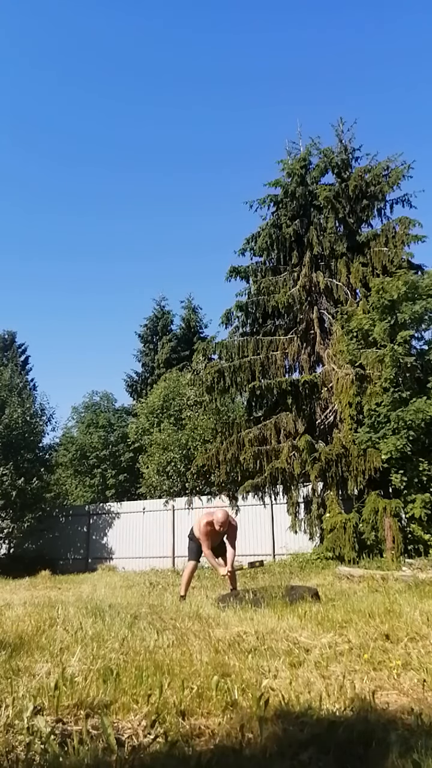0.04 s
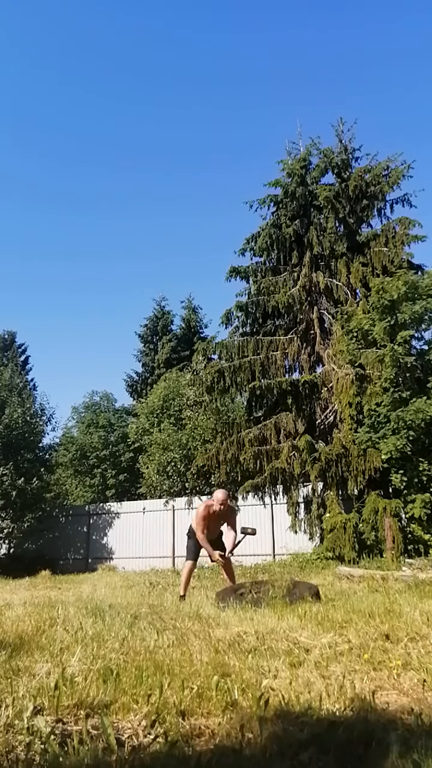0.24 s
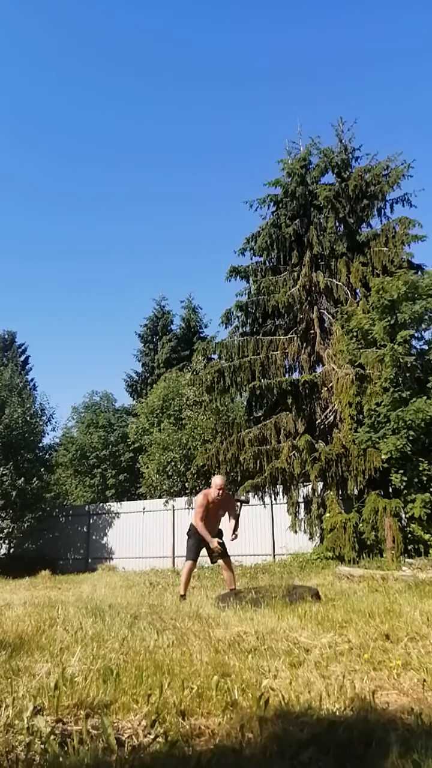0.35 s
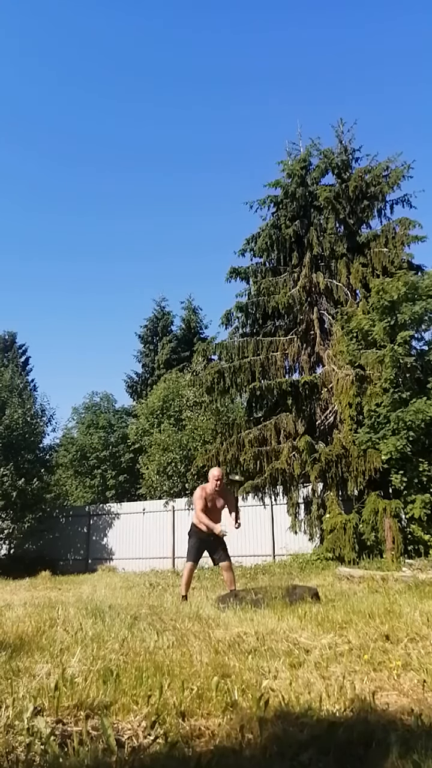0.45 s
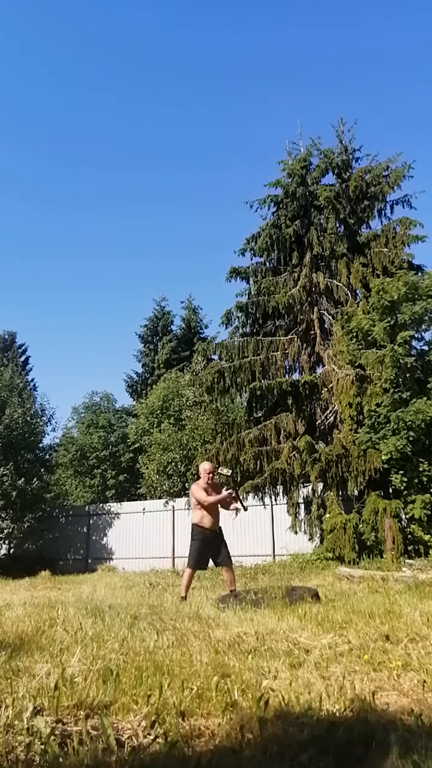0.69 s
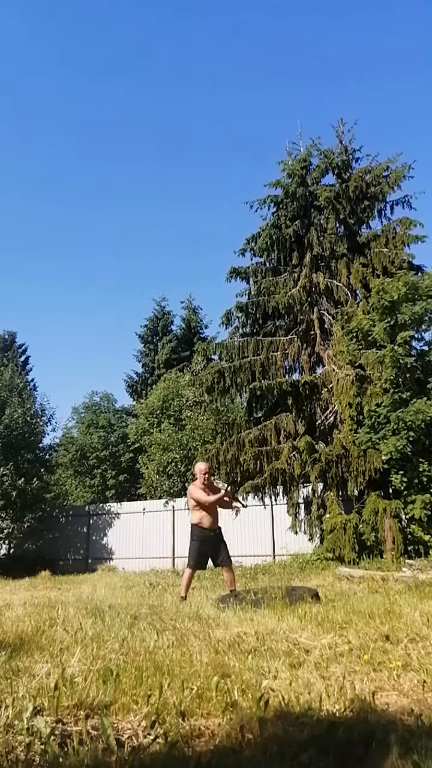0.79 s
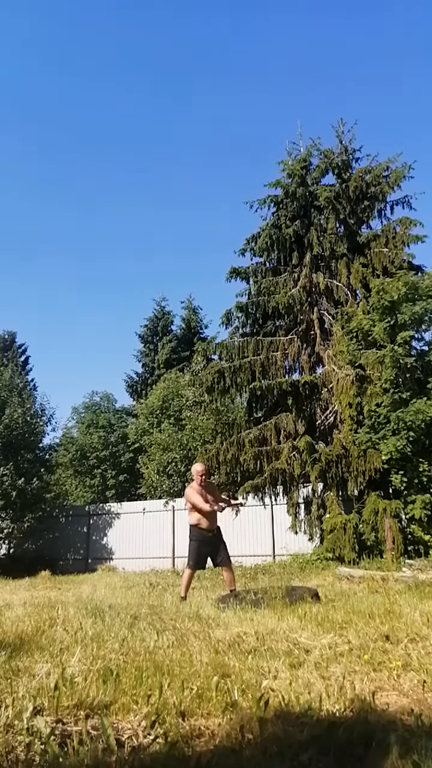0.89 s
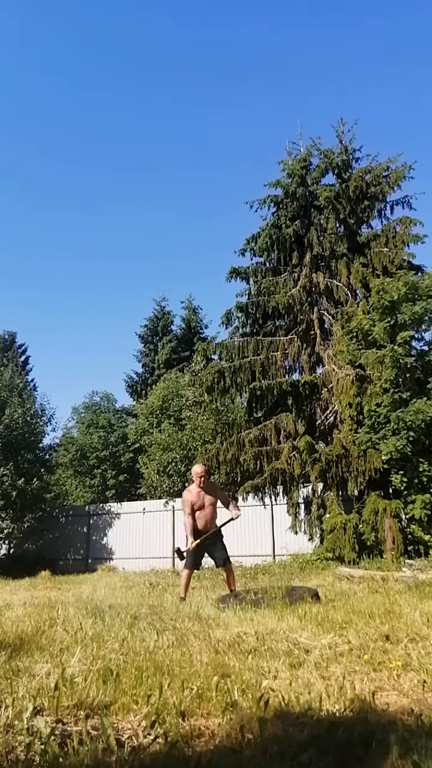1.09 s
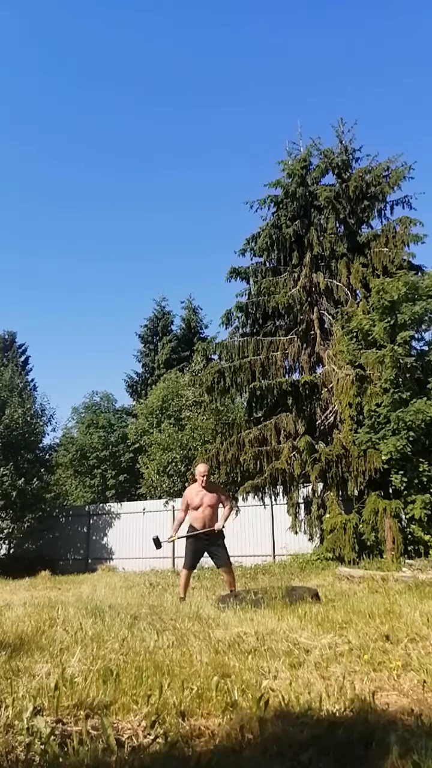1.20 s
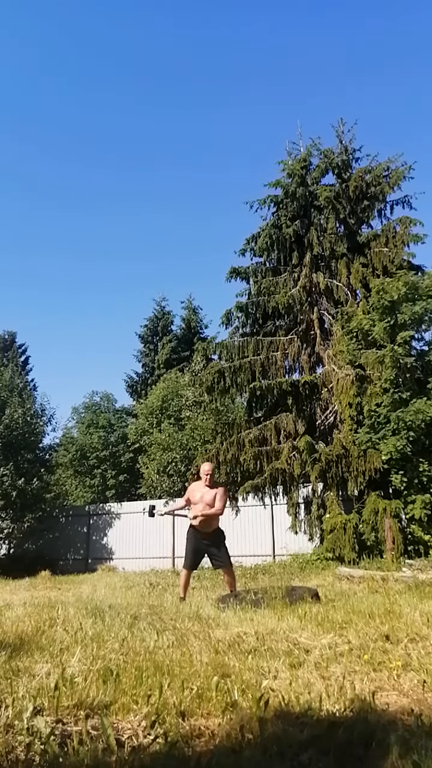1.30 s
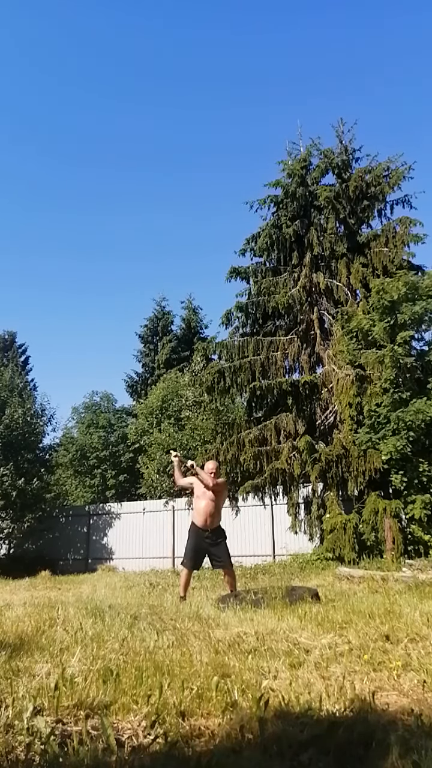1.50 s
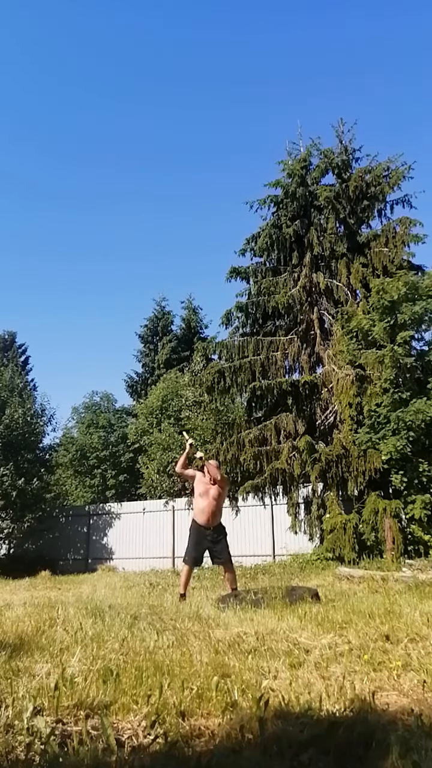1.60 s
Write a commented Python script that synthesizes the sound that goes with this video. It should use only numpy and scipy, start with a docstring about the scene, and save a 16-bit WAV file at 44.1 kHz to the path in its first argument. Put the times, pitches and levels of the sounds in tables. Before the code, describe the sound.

A sledgehammer hits a large tyre once: a brief swish, then a hard slap with a deep thud. The blow echoes briefly off fence and trees as the tyre settles softly on the grass in a quiet garden.

```python
"""On a garden lawn, a sledgehammer swishes down onto a large tyre lying in the grass.
Steel hits rubber with a hard slap and a softer second one, and the tyre rings with a deep thud.
Fence and trees throw the blow back; the tyre hops, settles and wobbles.
Behind it are quiet air, a faint low hum, tiny high ticks and two chirps from a far bird."""
import sys
import numpy as np
from scipy import signal
from scipy.io import wavfile

SR = 44100
rng = np.random.default_rng(int(sys.argv[2]) if len(sys.argv) > 2 else 0)


def wrap_up_sound(samples):
    """Save the sound to the file named by the first command line argument, as 16-bit audio."""
    columns = np.atleast_2d(samples).T
    # keep every value between -1 and 1, then stretch to whole-number steps
    tamed = np.clip(columns, -1, 1)
    steps = np.round(tamed * 32767).astype(np.int16)
    wavfile.write(sys.argv[1], SR, steps)


N = 72765
T = np.arange(N) / SR

# A fade is the time a sound takes to drop 60 dB. Pan is left minus right: below 0 leans right.
# garden air: (pitch [Hz], band level [dB])
AIR_BANDS = [(30, -67.5), (50, -83.5), (90, -83), (170, -76.5), (300, -85), (600, -85.5), (1300, -84),
             (3100, -86), (3900, -94), (5200, -85), (7000, -89), (11000, -89), (15000, -83.5)]
# how noise spreads between the ears: (pitch [Hz], pan [dB], likeness of left and right [0 to 1])
STEREO_SPREAD = [(40, -7, 1), (150, -14, 0.79), (500, -13.5, 0.84), (2020, -8, 0.14), (4000, -9.5, 0.5),
                 (8200, 8, 0.019), (14100, -1.5, 0.32)]
# distant hum: (time [s], pitch [Hz], level [dB])
HUM_PATH = [(0, 88.53, -76), (.75, 86.67, -67.5), (0.999, 85.16, -72.5), (1.2, 82.27, -65.5),
            (1.48, 82.1, -63.5), (1.65, 82.4, -70)]
# air rushing past the hammer: (pitch [Hz], band level at the blow [dB])
SWISH_BANDS = [(300, -73.5), (800, -72), (1300, -56), (2000, -56.5), (2900, -55.5), (3900, -75),
               (5300, -65), (9000, -69), (15000, -84.5)]
# the hammer meets the rubber: (time [s], ring level [dB], treble boost [dB per octave], grit level [dB])
SLAP_HITS = [(0.2001, 1, -0.5, -18), (0.2151, -16, 2.5, -20)]
# tones that ring in a slap: (pitch [Hz], level [dB], fade [s], pan [dB])
SLAP_TONES = [(696, -36.5, 0.033, -12), (800, -31, .02, -21), (1144, -28, 0.022, -16),
              (1800, -28, 0.0099, -8.5), (2390, -19.5, 0.0066, -14), (2736, -18.5, 0.0055, -8),
              (4720, -23, 0.005, -25), (5570, -31, 0.0058, 15.5), (8250, -14, 0.0035, 20),
              (9760, -29.5, 0.0066, 5), (11300, -25.5, 0.0025, 9)]
# ringing noise around the tyre: (pitch [Hz], band level [dB], fade [s])
TAIL_BANDS = [(35, -62.5, 0.33), (90, -38, 1), (149, -39, 1), (230, -39, .55), (350, -41.5, 0.41),
              (550, -47.5, 0.39), (800, -48, 0.17), (1200, -54.5, 0.3), (2970, -49.5, 0.51),
              (3800, -62.5, 0.51), (4870, -56, 0.41), (8800, -51.5, 0.39), (14900, -67, 0.22)]
# sound scattered by leaves: (pitch [Hz], band level [dB])
LEAF_BANDS = [(200, -75.5), (450, -67.5), (800, -71.5), (1200, -62.5), (2000, -61.5), (3000, -58),
              (3900, -67.5), (5200, -60.5), (8000, -58), (11000, -68), (15000, -74.5)]
# groups of trees that scatter the blow: (delay [s], level [dB])
TREE_GROUPS = [(0.114, 0), (.185, -4)]
# tones of the tyre's body: (pitch [Hz], level [dB], fade [s], direction of first swing [+1 or -1])
TYRE_TONES = [(79.5, -19, 0.13, -1), (144.3, -14.5, .15, 1), (198.7, -20, 0.2, 1), (260, -31.5, .23, -1),
              (329, -22.5, 0.13, -1), (390.4, -33, .1, -1), (463.3, -34.5, 0.14, 1), (520, -36, 0.048, 1)]
# separate echoes from fence and trees: (delay [s], level [dB])
ECHO_RETURNS = [(0.054, -11.5), (0.091, -26), (0.1473, -15), (.52, -49.5), (.59, -47)]
# the tyre drops back on the grass: (time [s], level [dB])
TYRE_LANDINGS = [(.434, -30.5), (.455, -30), (.492, -31), (0.521, -30), (.556, -35.5)]
# slow flexing of the tyre: (time [s], pitch [Hz], level [dB], fade [s])
TYRE_WOBBLES = [(.497, 44.1, -38.5, 0.35), (.556, 15.16, -41.5, 0.92)]
# a far bird: (time [s], length [s], first pitch [Hz], last pitch [Hz], level [dB])
BIRD_CHIRPS = [(1.193, 0.0595, 4650, 5170, -82), (1.242, 0.12, 2950, 3470, -81.5)]

HIT_S, SQUASH_S = .2003, .0012  # the rubber squashes briefly before the tyre rings
TYRE_PAN_DB, BACKGROUND_PAN_DB = -11.5, -9.5


def from_db(db):
    """Turn decibels into a number to multiply by."""
    return 10 ** (np.asarray(db) / 20)


def at_hz(rows, hz):
    """Read a table's other columns at one pitch, blending between rows."""
    pitches, *columns = np.transpose(rows)
    return [np.interp(np.log(hz), np.log(pitches), column) for column in columns]


def pan(db):
    """Share a sound between left and right, keeping its total power."""
    gains = from_db([[db / 2], [-db / 2]])
    return gains / np.sqrt(np.mean(gains ** 2))


def lowpass(x, hz):
    """Dull a sound by turning down what lies above hz."""
    return signal.sosfilt(signal.butter(2, hz, fs=SR, output="sos"), x + 1e-18)


def decay(start, fade_s):
    """A level that jumps to 1 and dies away."""
    return (T >= start) * 1e3 ** (-np.maximum(T - start, 0) / fade_s)


def ring(start, hz, fade_s):
    """One fading tone of a struck object."""
    return decay(start, fade_s) * np.sin(2 * np.pi * hz * (T - start))


def spread_noise(gain_at, pan_db=None):
    """Stereo noise in quarter-octave bands; gain_at(hz) gives the strength per quarter octave."""
    out, edges = 0, 22 * 2 ** np.arange(0, 9.6, .25)
    white = rng.standard_normal((2, 2, N + SR // 2))
    for k, (low, high) in enumerate(zip(edges, edges[1:])):
        band_filter = signal.butter(3, [low, high], "band", fs=SR, output="sos")
        band = signal.sosfilt(band_filter, white[k % 2])[:, -N:]
        mid, side = band / band.std(axis=1, keepdims=True)
        hz = np.sqrt(low * high)
        lean_db, alike = at_hz(STEREO_SPREAD, hz)
        pair = np.sqrt((1 + alike) / 2) * mid + np.sqrt((1 - alike) / 2) * side * [[1], [-1]]
        out = out + gain_at(hz) * np.sqrt(.5) * pair * pan(lean_db if pan_db is None else pan_db)
    return out


def garden_air():
    """The air makes a soft, steady hiss and rumble."""
    return spread_noise(lambda hz: from_db(at_hz(AIR_BANDS, hz)[0]), BACKGROUND_PAN_DB)


def distant_hum(octave_db=-23.5):
    """A low hum sinks a little in pitch as it swells."""
    times, hz, db = np.transpose(HUM_PATH)
    phase = 2 * np.pi * np.cumsum(np.interp(T, times, hz)) / SR
    tone = np.sin(phase) + from_db(octave_db) * np.sin(2 * phase)
    return np.sqrt(2) * from_db(np.interp(T, times, db)) * tone * pan(BACKGROUND_PAN_DB)


def faint_ticks(per_second=8, level_db=-75.5, pitch_hz=7800, fade_s=.015):
    """Tiny bursts of high fizz come at random moments."""
    fizz = lowpass(rng.standard_normal(N), hz=900) * np.sin(2 * np.pi * pitch_hz * T)
    starts = rng.random(N) < per_second / SR
    bursts = signal.lfilter([1], [1, -from_db(-60 / (fade_s * SR))], starts + 1e-18)  # each start fades
    return from_db(level_db) * bursts * fizz / fizz.std() * pan(BACKGROUND_PAN_DB)


def hammer_swish(swing_s=.14, stop_s=.0015, steepness=1.44, steeper_per_hz=.00012):
    """Rushing air grows with the hammer's speed, the treble most steeply, and stops at the blow."""
    speed = np.clip(1 + (T - HIT_S) / swing_s, 0, 1)
    stop = np.exp(-np.maximum(T - HIT_S, 0) / stop_s)

    def gain_at(hz):
        return from_db(at_hz(SWISH_BANDS, hz)[0]) * speed ** (steepness + steeper_per_hz * hz) * stop
    return spread_noise(gain_at)


def hammer_slaps(contact_s=.0006, pivot_hz=3000, grit_cut_hz=10500, cut_hz=14100):
    """Steel lands on rubber: short bright tones and a burst of grit build up during contact."""
    out = 0
    for start, ring_db, boost_db, grit_db in SLAP_HITS:
        contact = np.clip((T - start) / contact_s, 0, 1) ** .5
        tones = 0
        for hz, db, fade_s, pan_db in SLAP_TONES:
            gain = from_db(db + boost_db * np.log2(hz / pivot_hz))
            tones = tones + gain * ring(start, hz, fade_s) * pan(pan_db)
        hiss = lowpass(rng.standard_normal((2, N)), grit_cut_hz)
        grit = hiss * decay(start, fade_s=.0022) * pan(db=2.5)
        out = out + contact * (from_db(ring_db) * tones + from_db(grit_db) * grit)
    return lowpass(lowpass(out, cut_hz), cut_hz)


def ringing_tail():
    """A wash of noise hangs around the tyre after the blow; low pitches last longest."""
    def gain_at(hz):
        db, fade_s = at_hz(TAIL_BANDS, hz)
        return from_db(db) * decay(HIT_S, fade_s)
    return spread_noise(gain_at)


def leaf_scatter(rise_s=.015, fade_s=.72, loss_db_per_s_khz=6.5):
    """Each group of trees sends back a soft blur of the blow; the longer the path, the less treble."""
    age = np.maximum(T - HIT_S, 0)
    power = 0
    for delay, db in TREE_GROUPS:
        rise = np.exp(-np.maximum(delay - age, 0) / rise_s)
        fall = from_db(-60 * np.maximum(age - delay, 0) / fade_s)
        power = power + (from_db(db) * rise * fall) ** 2
    swell = (T > HIT_S) * np.sqrt(power)

    def gain_at(hz):
        loss_db = loss_db_per_s_khz * age * hz / 1000
        return swell * from_db(at_hz(LEAF_BANDS, hz)[0] - loss_db)
    return spread_noise(gain_at)


def tyre_thud(start):
    """One push sets the tyre's body ringing with deep tones."""
    tones = sum(np.sign(way) * from_db(db) * ring(start, hz, fade_s) for hz, db, fade_s, way in TYRE_TONES)
    return tones * pan(TYRE_PAN_DB)


def echoes(start, cut_hz=132):
    """Fence and trees return late, dull copies of the thud."""
    return lowpass(sum(from_db(db) * tyre_thud(start + delay) for delay, db in ECHO_RETURNS), cut_hz)


def landings(cut_hz=252):
    """The tyre drops back on the grass with small, muffled thuds."""
    thuds = sum(from_db(db) * tyre_thud(start) for start, db in TYRE_LANDINGS)
    return lowpass(lowpass(thuds, cut_hz), cut_hz)


def wobble():
    """The tyre flexes slowly after it lands."""
    return sum(from_db(db) * ring(start, hz, fade_s) for start, hz, db, fade_s in TYRE_WOBBLES) * pan(db=-24)


def far_bird(blur_hz=120):
    """A bird gives two rising chirps, blurred by a random flutter."""
    blur = lowpass(rng.standard_normal(N), blur_hz)
    chirps = 0
    for start, length, first_hz, last_hz, db in BIRD_CHIRPS:
        progress = np.clip((T - start) / length, 0, 1)
        phase = 2 * np.pi * np.cumsum(first_hz + (last_hz - first_hz) * progress) / SR
        chirps = chirps + from_db(db) * np.sin(np.pi * progress) * np.sin(phase)
    return chirps * blur / blur.std() * pan(BACKGROUND_PAN_DB)


def scene():
    """Add up the hammer, the tyre, the returning sound and the quiet garden."""
    thud_s = HIT_S + SQUASH_S
    hammer = hammer_swish() + hammer_slaps()
    tyre = tyre_thud(thud_s) + landings() + wobble()
    returning = ringing_tail() + leaf_scatter() + echoes(thud_s)
    garden = garden_air() + distant_hum() + far_bird() + faint_ticks()
    return hammer + tyre + returning + garden


def record(dry, cut_hz=16000):
    """Cut away the very highest treble."""
    return signal.sosfilt(signal.ellip(10, .1, 80, cut_hz, fs=SR, output="sos"), dry)


dry = scene()
out = record(dry)
wrap_up_sound(out)
```